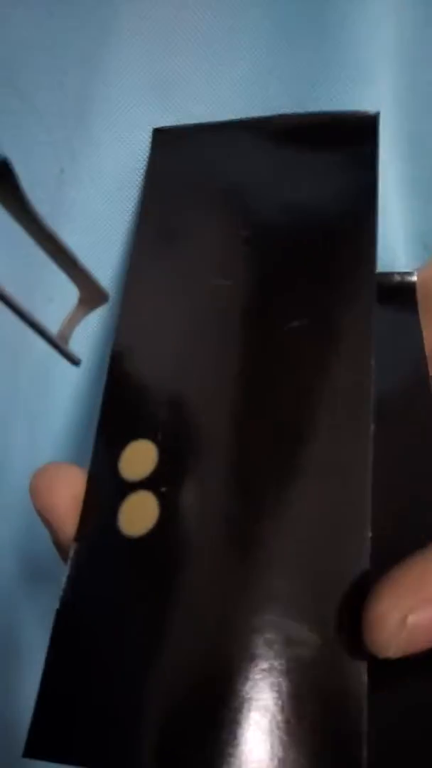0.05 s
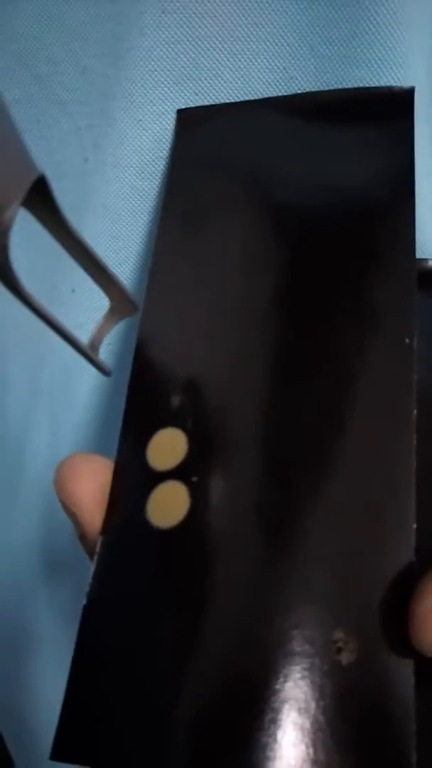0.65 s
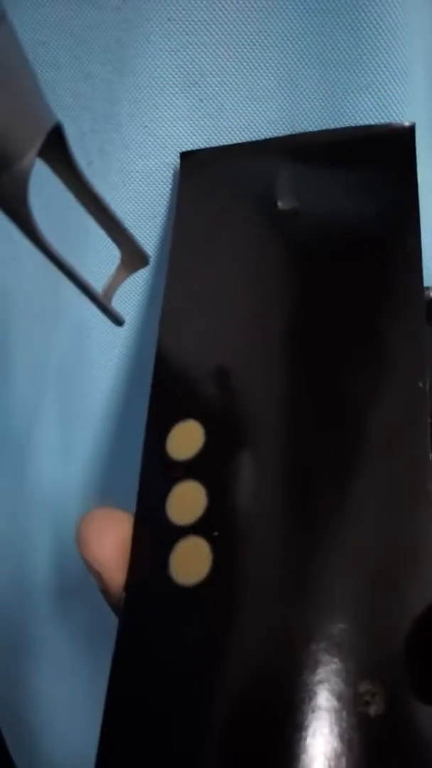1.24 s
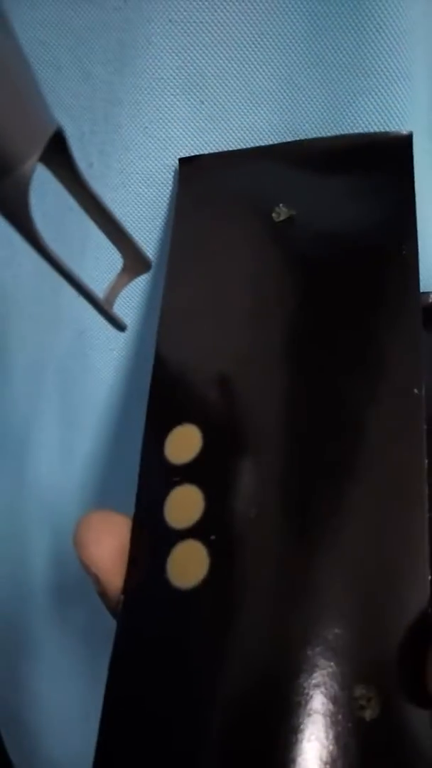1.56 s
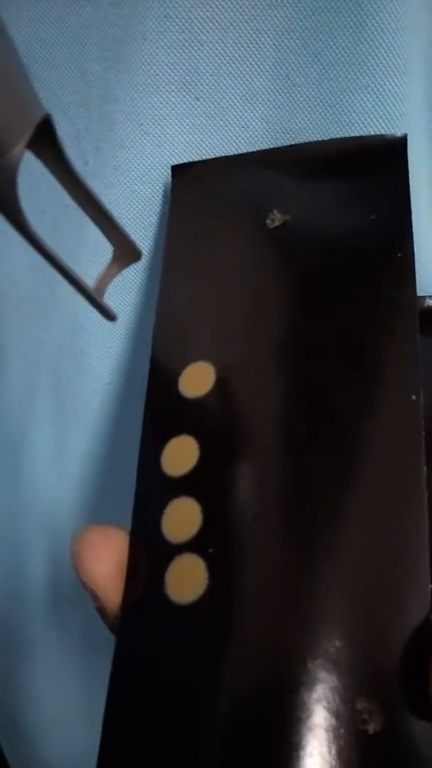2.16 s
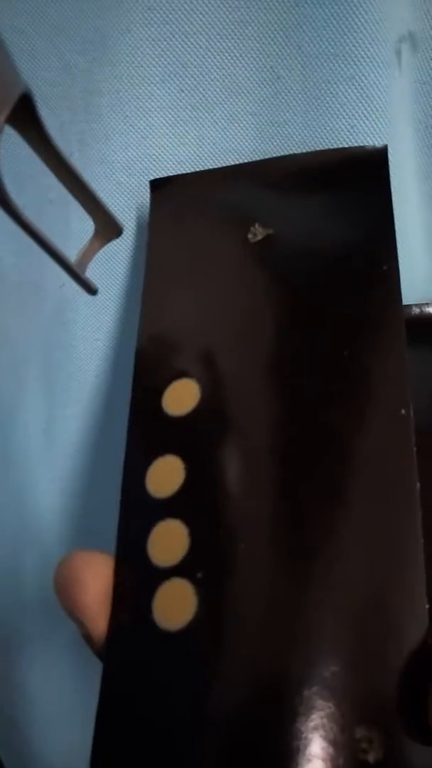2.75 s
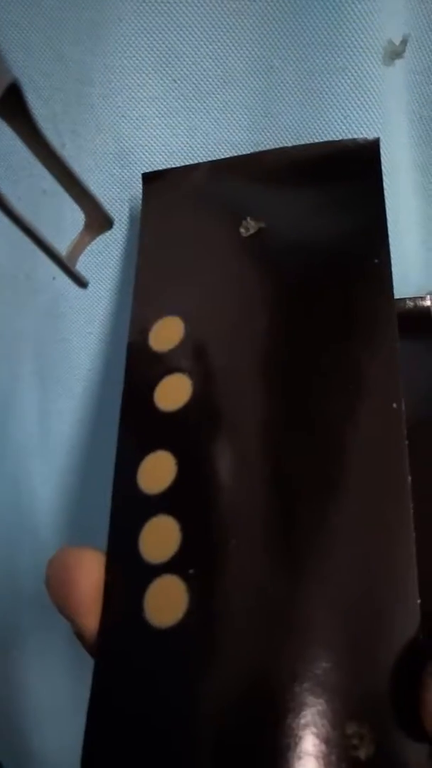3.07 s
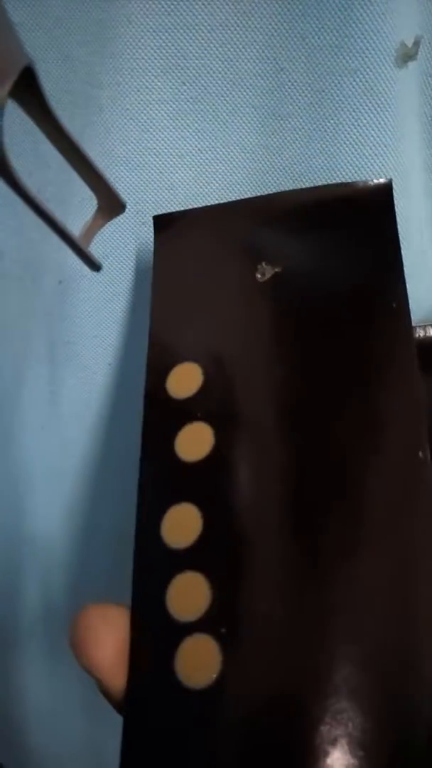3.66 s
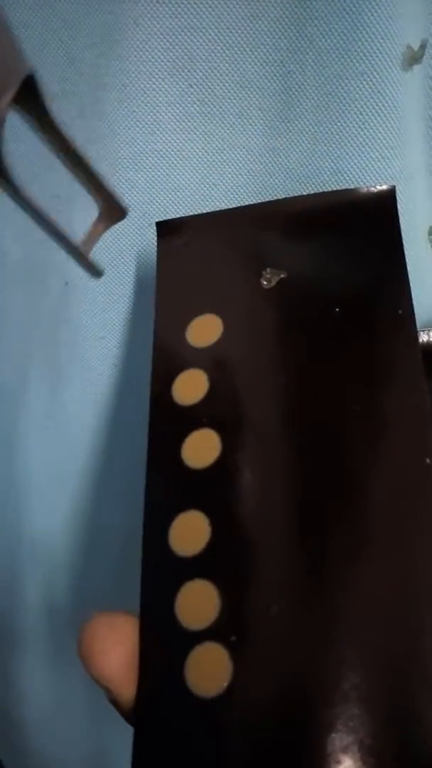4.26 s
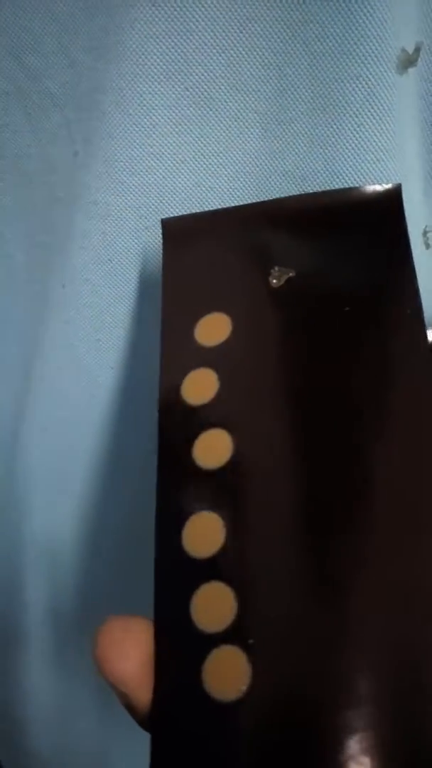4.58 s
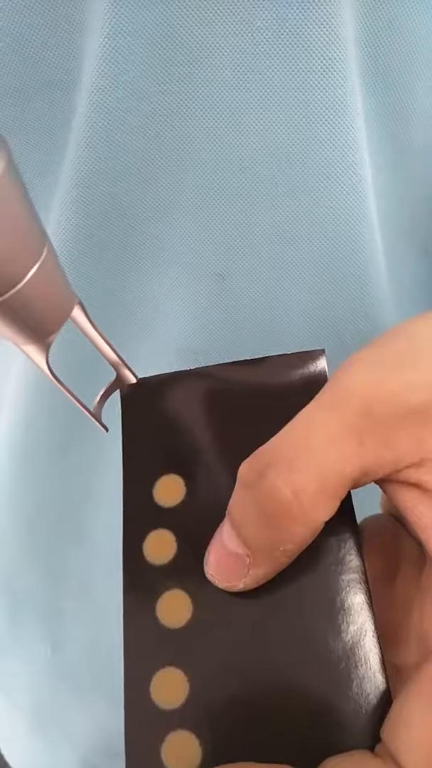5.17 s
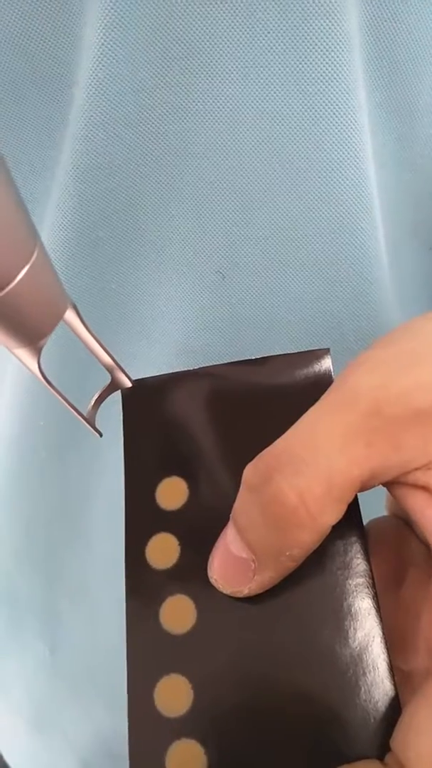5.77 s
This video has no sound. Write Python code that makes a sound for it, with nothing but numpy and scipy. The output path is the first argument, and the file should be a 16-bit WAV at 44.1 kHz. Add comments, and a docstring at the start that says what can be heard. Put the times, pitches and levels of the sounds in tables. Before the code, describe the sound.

A treatment laser fires at a sheet of film five times, about once a second. Each pulse is a sharp, close snap with a low thump and a bright ring from the hard-walled room. Underneath, the machine's cooling hums low and ticks softly, and the hand-held film rustles faintly. After the last snap, a faint hollow rush sets in and a tiny click follows.

```python
"""Sharp snaps, about one a second, each with a low thump and the bright ring of a hard-walled room.
A treatment laser is firing at a sheet of black film, and each pulse blasts off some of the coating.
Behind the snaps the machine's cooling hums and ticks softly, the hand-held film rustles, and a faint
hollow rush sets in near the end. An automatic gain control turns everything down briefly at each snap."""
import sys
import numpy as np
from scipy import signal
from scipy.fft import rfft, irfft, next_fast_len
from scipy.io import wavfile
from scipy.ndimage import uniform_filter1d, minimum_filter1d, map_coordinates

SR = 44100
rng = np.random.default_rng(int(sys.argv[2]) if len(sys.argv) > 2 else 0)


def store_pcm(level_fs):
    """Save levels as 16-bit WAV."""
    pcm = np.round(np.clip(level_fs, -1, 1) * 32767).astype(np.int16)
    wavfile.write(sys.argv[1], SR, np.atleast_2d(pcm).T)


N = 261072

# The laser pulses, and how the film is gripped at each one:
# (time [s], crack [dB], blast [dB], thump [dB], wall echo delay [s], wall echo [dB], room [dB],
#  film tension [pitch ratio], flap of the free sheet [Hz], boosted band [Hz], damped band [Hz],
#  width of the damped band [Hz], highest ringing [Hz])
LASER_PULSES = [(-.253, -12, 0, 6, .016, -8, -19.5, 1, 300, 2500, 3000, 500, 6000),
                (.855, -11, -1.5, 9, 0.007, -6, -19, 0.98, 175, 2450, 5120, 1300, 7000),
                (1.9731, -2.3, 1, 1, 0.016, -20.5, -19.5, 1.026, 440, 800, 1600, 1000, 7120),
                (3.067, -8.5, 2.5, 5.5, 0.013, -11, -19.5, 0.98, 400, 4120, 3330, 750, 5900),
                (4.181, -9, -0.5, 3.2, 0.01, -4, -19, 1.0, 330, 3200, 2270, 400, 3780)]
# The dull tone colour of rustles and scuffs: (frequency [Hz], level [dB])
RUSTLE_SPECTRUM = [(250, -26), (450, 12), (620, 9), (850, 10), (1200, 0.5), (1900, -1), (2900, -12),
                   (4500, -36), (10000, -66)]


def amp(db):
    """Turn decibels into a factor to multiply by."""
    return 10 ** (np.asarray(db) / 20)


def unit(x):
    """Scale x to an average (rms) size of 1."""
    return x / np.sqrt(np.mean(x ** 2) + 1e-20)


def clock():
    """The time of each sample in seconds."""
    return np.arange(N) / SR


def along(points, hz):
    """Read between (frequency, value) points on a logarithmic frequency axis."""
    freqs, values = np.transpose(points)
    return np.interp(np.log(hz + 1), np.log(freqs + 1), values)


def curves(rows):
    """Join (time, value, ...) rows with straight lines, one curve for each value column."""
    times, *columns = np.transpose(rows)
    return [np.interp(clock(), times, column) for column in columns]


def wobble(rate):
    """A smooth curve through `rate` random values a second."""
    return map_coordinates(rng.standard_normal(int(N * rate / SR) + 4), [clock() * rate])


def burst(t, rise, t60):
    """A loudness curve that climbs 60 dB in `rise` seconds, peaks at t = 0 and falls 60 dB in `t60`."""
    return amp(-60 * np.maximum(-t / rise, t / t60))


def bell(centre_s, half_s):
    """A rounded loudness curve that swells and fades around centre_s."""
    return np.exp(-.5 * np.abs((clock() - centre_s) / half_s) ** 3)


def filtered(x, response):
    """Filter x; response(hz) gives the gain at each frequency."""
    size = next_fast_len(N + 8192)
    return irfft(rfft(x, size) * response(np.fft.rfftfreq(size, 1 / SR)), size)[..., :N]


def shape(points):
    """A filter response that follows (frequency, level) points."""
    return lambda hz: amp(along(points, hz))


def resonances(modes):
    """The filter response of an object that rings at (frequency, width, level) peaks."""
    return lambda hz: sum((-1) ** k * amp(db) * 1j * hz * width / (peak ** 2 - hz ** 2 + 1j * hz * width)
                          for k, (peak, width, db) in enumerate(modes))


def humps(modes, hz):
    """The gain of steep-sided (frequency, width, level) bands."""
    return sum(amp(db) / np.sqrt(1 + (2 * (hz - centre) / width) ** 8) for centre, width, db in modes)


def noise(response):
    """Mono noise with the given tone colour."""
    return unit(filtered(rng.standard_normal(N), response))


def diffuse(response):
    """Stereo noise in which only the treble differs between the ears."""
    # How much the ears differ: (frequency [Hz], side level relative to mid [dB])
    stereo_width = [(3000, -70), (4500, -20), (6500, -9), (10000, -7)]
    mid = filtered(rng.standard_normal(N), response)
    side = filtered(rng.standard_normal(N), lambda hz: response(hz) * shape(stereo_width)(hz))
    return unit(np.array([mid + side, mid - side]))


def cooling(pump_hz=208.6, motor_hz=199.3, whine_hz=713, hiss_db=-58.5):
    """Fan air churns in the cabinet while a pump and a motor hum so close in pitch that they beat."""
    # The cooling's slow swell: (time [s], fan air [dB], hum [dB])
    swell = [(0.02, -46, -49.5), (0.74, -44.8, -50), (1.1, -50.5, -52.5), (1.26, -45, -44.5),
             (1.5, -50.5, -52.5), (1.66, -46.5, -45), (1.82, -50.5, -52.5), (2.34, -43, -48),
             (2.74, -47, -52.5), (2.98, -45, -44.6), (3.34, -50.6, -64.6), (3.5, -49, -47),
             (3.74, -50, -54), (3.9, -46.5, -47), (4.9, -45.5, -51.5), (5.46, -50, -52), (5.7, -47.2, -59),
             (5.92, -51, -48.5)]
    # The fan's low rush of air: (frequency [Hz], level [dB])
    air_spectrum = [(20, -56.5), (45, -35), (75, -14.5), (110, -8), (170, -3.5), (215, 3), (270, -2),
                    (330, -3.5), (440, -5), (560, -12.5), (900, -37), (2000, -77.5)]
    # Resonances of the air in the cabinet: (frequency [Hz], width [Hz], level [dB])
    cabinet_modes = [(110.5, 35, -4.5), (146.6, 16, -3.5), (265, 33, 2), (321.7, 33, 2), (382.3, 23, -5),
                     (438, 36, -1)]
    # The soft background hiss: (frequency [Hz], level [dB])
    hiss_spectrum = [(40, -21.5), (150, -5), (600, 6), (900, 4.5), (1400, 0), (2600, -4), (4200, -11.5),
                     (6000, -19.5), (9500, -22.5), (11000, -40)]

    def tone(hz):
        """A hum that wavers a little in loudness and pitch."""
        waver = amp(2 * wobble(rate=22))
        return waver * np.sqrt(2) * np.sin(2 * np.pi * hz * clock() + 0.89 * wobble(rate=9))

    fan_db, hum_db = curves(swell)
    fan_db += 0.5 * wobble(rate=11)
    hum_db += 3.5 * wobble(rate=9)
    churn = 0
    for hz, width, db in cabinet_modes:
        strength = amp(db + 4.5 * wobble(rate=14))
        drift = 2.19 * wobble(rate=width)  # a wider resonance drifts faster
        churn += strength * np.sin(2 * np.pi * hz * clock() + drift)
    flutter = amp(-6 + 4.5 * wobble(rate=36)) * noise(shape(air_spectrum))
    air = amp(fan_db) * (flutter + amp(-2) * unit(churn))
    pump = amp(-3) * (tone(pump_hz) + amp(-5) * tone(2 * pump_hz))
    motor = amp(-7) * tone(motor_hz)
    whine = amp(-67) * tone(whine_hz)
    drop_db, = curves([(4.98, 0), (5.1, -10)])  # the hiss gets quieter near the end
    hiss = amp(hiss_db + drop_db) * diffuse(shape(hiss_spectrum))
    return air + amp(hum_db) * (pump + motor) + whine + hiss


def ticks(ring_db=-6, scuff_db=1.5):
    """Once a second a soft tick, led by a dull scuff, rings the cabinet and spreads in the room."""
    # Ticks inside the machine: (time [s], level [dB])
    tick_times = [(0.764, -49), (1.772, -48.5), (2.749, -49), (3.764, -49), (4.772, -48.5)]
    # A tick spreading in the room: (frequency [Hz], level [dB])
    spread_spectrum = [(400, -19.5), (1400, -1), (2200, 7.5), (3000, 9), (4200, 1), (6000, -12),
                       (9000, -16.5), (11000, -30.5)]
    # The cabinet's ringing: (frequency [Hz], width [Hz], level [dB])
    ring_modes = [(1554, 38, 0), (2170, 23, 6), (2810, 65, 3.5), (3160, 70, -8), (3270, 19, -5.5),
                  (3396, 90, -1.5)]
    spread = sum(amp(db) * burst(clock() - at - .008, rise=0.047, t60=0.55) for at, db in tick_times)
    ring = sum(amp(db) * burst(clock() - at - .008, rise=0.044, t60=0.43) for at, db in tick_times)
    scuff = sum(amp(db) * bell(at - .006, half_s=.024) for at, db in tick_times)
    return (spread * diffuse(shape(spread_spectrum))
            + amp(ring_db) * ring * noise(resonances(ring_modes))
            + amp(scuff_db) * scuff * noise(shape(RUSTLE_SPECTRUM)))


def hollow_rush(rush_full_s=5.0, rush_rise_s=.17, click_s=5.88):
    """A faint, hollow rush with wavering whistling bands sets in near the end, then a small click."""
    # The whistling bands of the rush: (frequency [Hz], width [Hz], level [dB])
    whistle_bands = [(1295, 340, 0.5), (1627, 94, 1.5), (1914, 170, 2), (2220, 120, -5.5), (2525, 89, -0.5),
                     (2760, 100, -4), (3020, 78, -3), (3460, 220, -7), (3890, 150, -7), (4224, 150, -7.5),
                     (4720, 150, -11), (5580, 140, -17), (6150, 140, -21.5), (6580, 200, -18),
                     (6970, 110, -18.5)]
    # The hollow body of the rush: (frequency [Hz], level [dB])
    body_spectrum = [(60, -35), (300, -14), (550, 3.5), (900, 0), (1200, -11.5), (2200, -26), (4500, -37),
                     (7000, -40), (11000, -44)]
    # The click's high ringing: (frequency [Hz], width [Hz], level [dB])
    click_modes = [(3560, 74, -4), (4050, 220, -10.5), (4750, 110, -8), (9400, 250, -17)]
    fade_in = amp(60 * np.minimum(clock() - rush_full_s, 0) / rush_rise_s)
    flicker = amp(-54.5 + 2 * wobble(rate=25))
    whistle = 0
    for band in whistle_bands:
        waver = amp(4 * wobble(rate=20))
        whistle += waver * filtered(rng.standard_normal(N), lambda hz: humps([band], hz))
    rush = amp(-2) * noise(shape(body_spectrum)) + amp(-10.5) * unit(whistle)
    click = amp(-57) * burst(clock() - click_s, rise=.03, t60=0.07) * noise(resonances(click_modes))
    return fade_in * flicker * rush + click


def film_rustles(ripple_db=5, grain_db=3, flex_db=1.5):
    """The flexing sheet gives grainy rustles, and a finger slides over it with a thin hiss."""
    # The film shifts in the hand: (time [s], level [dB], half length [s])
    shifts = [(0.212, -43, 0.013), (0.262, -44.5, 0.025), (0.328, -49, 0.0083), (0.464, -52.5, 0.012),
              (1.465, -48, 0.085), (1.613, -46.5, 0.028), (1.901, -48, 0.019), (3.512, -51, .02)]
    rustles = np.zeros(N)
    ripple_hz = np.arange(0, 6000, 110)
    for at, db, half_s in shifts:
        ripple = ripple_db * rng.standard_normal(len(ripple_hz))  # each rustle has its own colour
        colour = lambda hz: shape(RUSTLE_SPECTRUM)(hz) * amp(np.interp(hz, ripple_hz, ripple))
        rustles += amp(db) * bell(at, half_s) * noise(colour)
    slide_colour = shape([(2000, 1), (5000, -1), (9500, -5), (11000, -21)])
    slide = amp(-65.5) * bell(centre_s=0.42, half_s=0.15) * diffuse(slide_colour)
    grain = unit(amp(grain_db * wobble(rate=190) + flex_db * wobble(rate=25)))
    return rustles * grain + slide


def room_ring(build_s=0.009):
    """The hard walls ring on after each snap; every frequency dies away at its own speed."""
    # The room's bright tone colour: (frequency [Hz], level [dB])
    room_spectrum = [(200, -27), (900, -8), (1600, -8.5), (2800, -2), (4500, 0), (6500, 2), (8000, 4),
                     (9400, 9.5), (10500, -2.5), (11300, -37.5)]
    # How long the room rings: (frequency [Hz], time to fall 60 dB [s])
    ring_times = [(500, 0.49), (2500, 0.56), (4500, 0.62), (7000, 0.51), (10000, 0.41)]
    hz, t, bands = signal.stft(diffuse(shape(room_spectrum)), SR, nperseg=256)
    t60 = along(ring_times, hz)[:, None]
    power = 0
    for at, _, _, _, _, _, room_db, *_ in LASER_PULSES:
        age = np.maximum(t - at, 0)
        build_up = 1 - np.exp(-age / build_s)
        power += (build_up * amp(room_db - 60 * age / t60)) ** 2
    return signal.istft(bands * np.sqrt(power), SR, nperseg=256)[1][:, :N]


def film_ring(hz, tension, flap_hz, boost_hz, damped_hz, damped_width, top_hz):
    """The sheet's response: its free part flaps; the grip retunes, boosts and damps its ringing."""
    # The film's resonances, rung by every blast: (frequency [Hz], width [Hz], level [dB])
    sheet_modes = [(790, 230, 1.5), (1150, 250, -1.5), (1500, 240, -5), (1860, 250, 1), (2270, 200, 2.5),
                   (2790, 370, 1), (3556, 340, 1.5), (4238, 330, -0.5), (4830, 180, -3.5),
                   (5670, 170, -4.5), (6570, 300, -4)]
    boost_db = 4 * humps([(boost_hz, 850, 0)], hz)
    damping_db = 20 * humps([(damped_hz, damped_width, 0)], hz)
    treble_cut = 1 / (1 + (hz / top_hz) ** 40)
    flap = humps([(flap_hz, flap_hz / 1.5, 2)], hz)
    return flap + humps(sheet_modes, hz / tension) * amp(boost_db - damping_db) * treble_cut


def laser_snaps(crack_lead_s=0.0077, thump_hz=108, spiky_db=4.5):
    """Each pulse gives a bright crack, a blast of vapour with a low thump, and a near wall's echo."""
    # The bright crack: (frequency [Hz], level [dB])
    crack_spectrum = [(500, -19.5), (2000, -11.5), (4000, -5.5), (7000, -4.5), (9500, -1), (11000, -26)]
    # The blast of vapour, without the film's ringing: (frequency [Hz], level [dB])
    blast_spectrum = [(25, 3.5), (100, 11), (200, 2), (330, -3.5), (520, -3.5), (750, -6.5), (1300, -3.5),
                      (2200, -11.5), (3500, -16), (6000, -15), (11000, -34.5)]
    snaps = np.zeros((2, N))
    for at, crack_db, blast_db, thump_db, echo_s, echo_db, _, *grip in LASER_PULSES:
        t = clock() - at
        crack = burst(t + crack_lead_s, rise=0.017, t60=0.06) * diffuse(shape(crack_spectrum))
        # the blast breaks into steep little shock fronts, and one stands out at its peak
        shocks = unit(amp(spiky_db * wobble(rate=1700)) * rng.standard_normal(N))
        front = amp(3) * burst(t, rise=0.0045, t60=0.0032)
        swell = burst(t, rise=0.042, t60=0.05)
        echo = amp(echo_db) * burst(t - echo_s, rise=0.0089, t60=0.075)
        colour = lambda hz: unit(shape(blast_spectrum)(hz) + film_ring(hz, *grip))
        blast = filtered((swell + front + echo) * shocks, colour)
        blast *= amp(60 * np.minimum(t + 0.014, 0) / 0.011)  # keep it quiet until the crack starts
        thump = -np.cos(2 * np.pi * thump_hz * t) * burst(t - .002, rise=0.034, t60=0.037)
        snaps += amp(crack_db) * crack + amp(blast_db) * blast + amp(thump_db) * thump
    return snaps


def scene():
    """Laser snaps and the ringing room over the running machine and the rustling film."""
    return laser_snaps() + room_ring() + cooling() + ticks() + film_rustles() + hollow_rush()


def gain_control(x, threshold_db=-17, depth_db=14, split_hz=800, ahead_samples=660):
    """The gain drops just ahead of a loud sound; treble comes back steadily, bass late and fast."""
    loud = uniform_filter1d(x[0] ** 2, size=256) > amp(threshold_db) ** 2

    def gain(hold_s, recover_db_per_s):
        """Hold the cut, then let it go at a steady rate."""
        span = int(hold_s * SR) + ahead_samples
        shift = (span - 1) // 2 - ahead_samples + 1
        held_db = -minimum_filter1d(-depth_db * loud.astype(float), span, origin=shift)
        ramp_db = recover_db_per_s * clock()
        cut_db = np.maximum.accumulate(held_db + ramp_db) - ramp_db
        return amp(-uniform_filter1d(cut_db, size=300))

    bass = filtered(x, lambda hz: 1 / (1 + (hz / split_hz) ** 4))
    treble = x - bass
    return (bass * gain(hold_s=0.091, recover_db_per_s=330)
            + treble * gain(hold_s=0.008, recover_db_per_s=122))


def record(dry):
    """Turn loud moments down, round off the peaks and remove the highest treble."""
    ceiling, top_hz = .8, 11300
    ducked = gain_control(dry)
    rounded = ducked / (1 + np.abs(ducked / ceiling) ** 6) ** (1 / 6)
    return filtered(rounded, lambda hz: 1 / np.sqrt(1 + (hz / top_hz) ** 120))


dry = scene()
out = record(dry)
store_pcm(out)
```